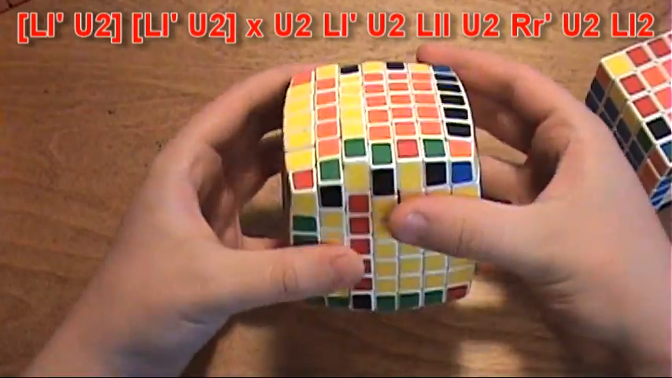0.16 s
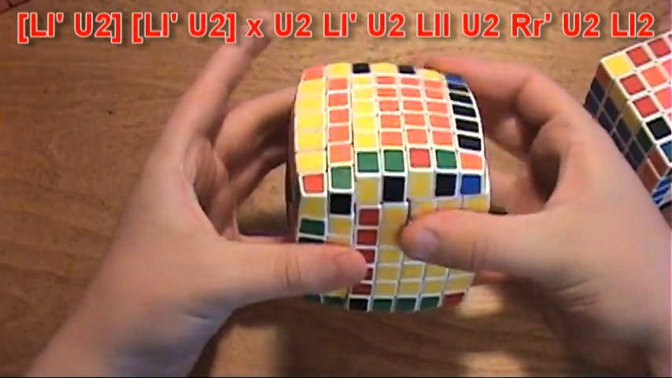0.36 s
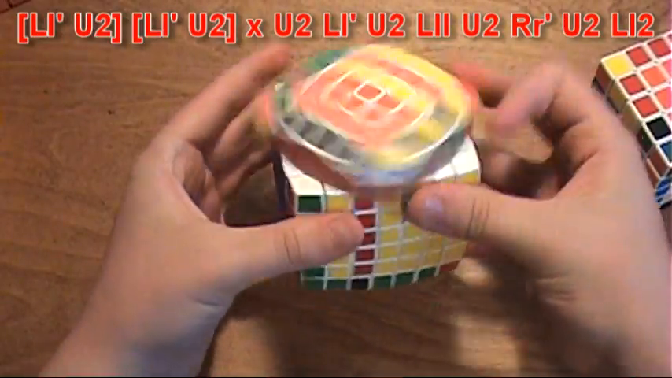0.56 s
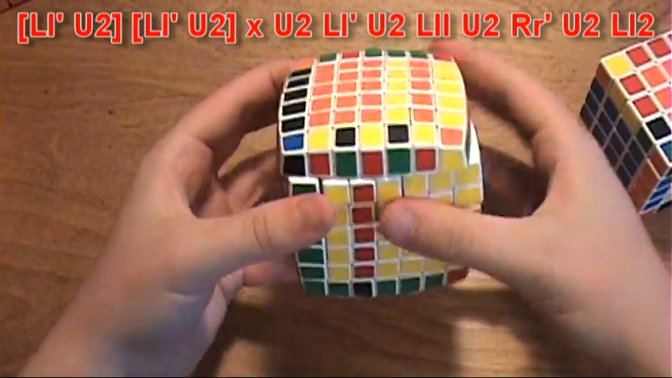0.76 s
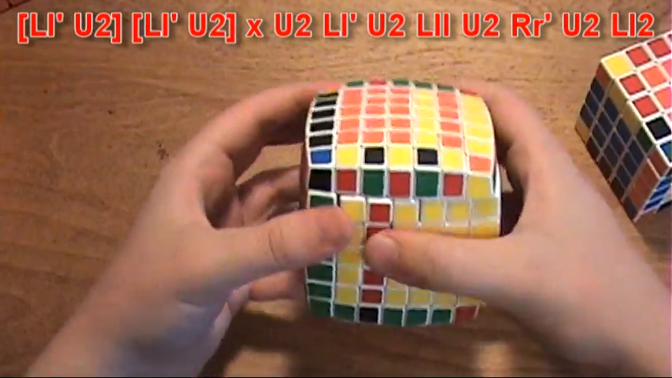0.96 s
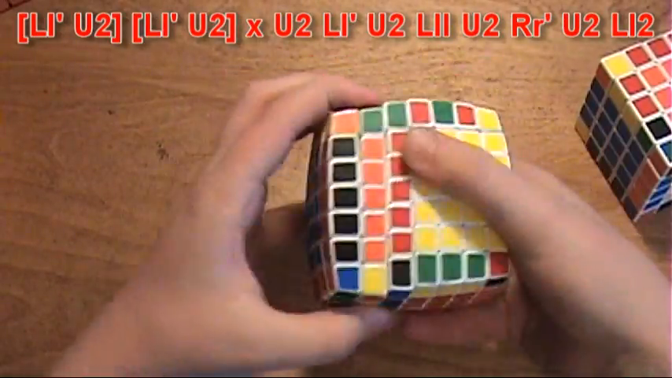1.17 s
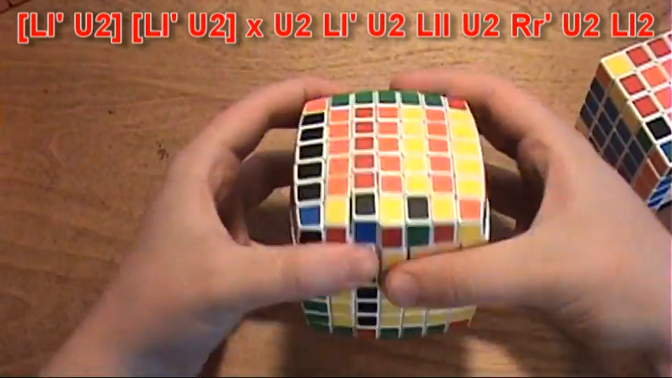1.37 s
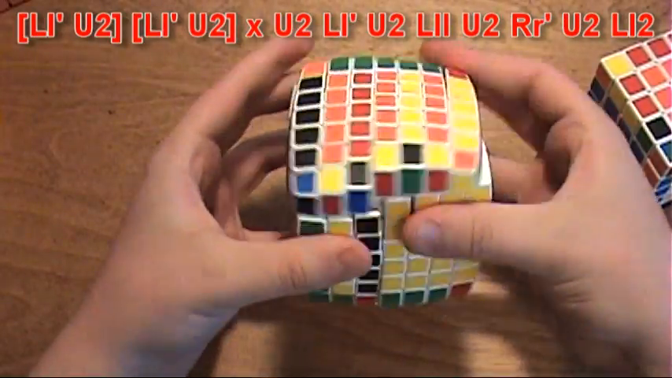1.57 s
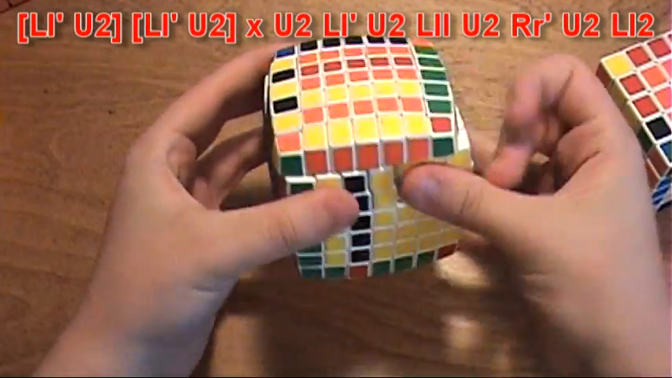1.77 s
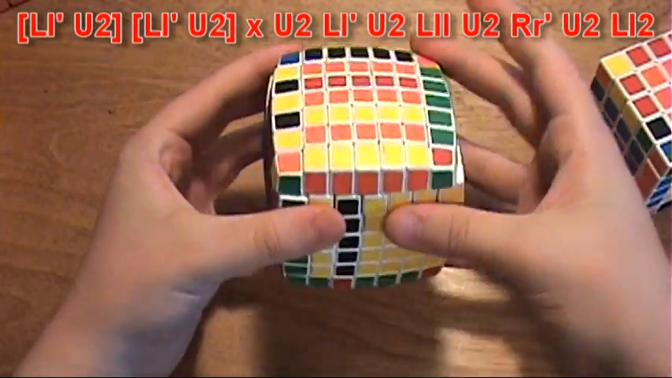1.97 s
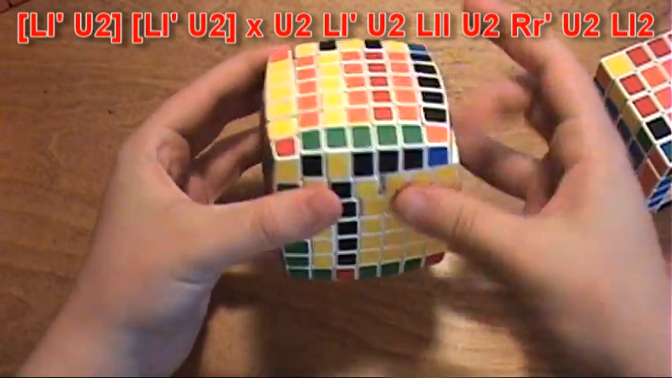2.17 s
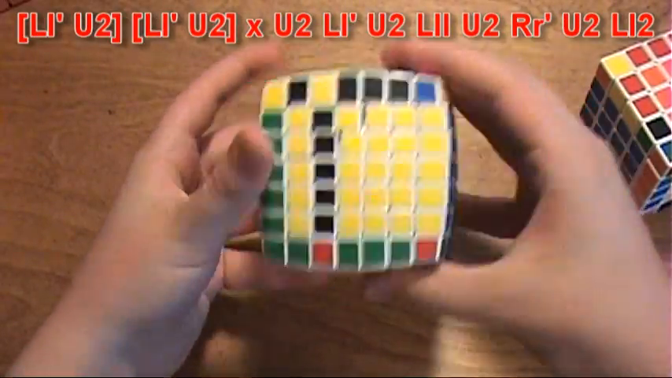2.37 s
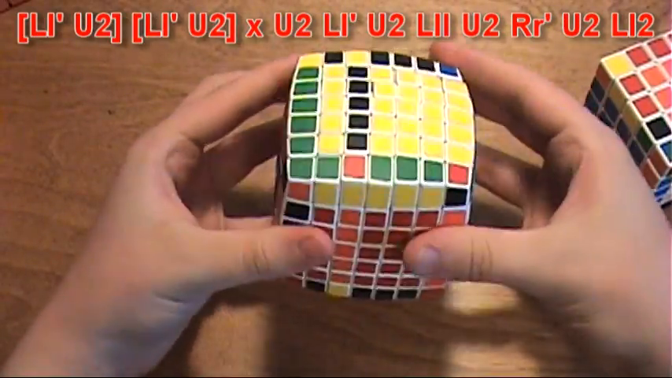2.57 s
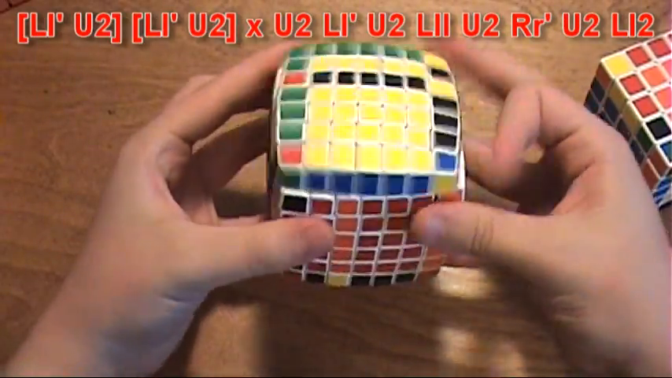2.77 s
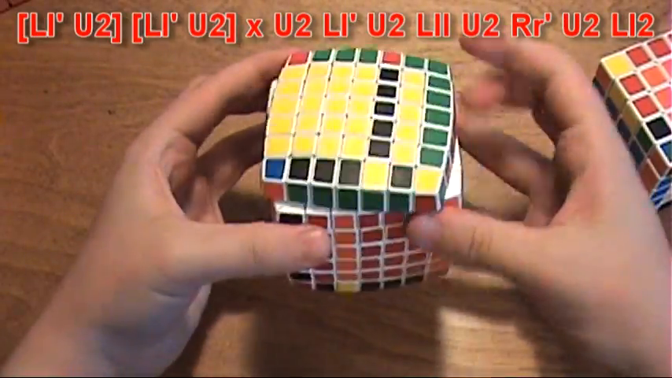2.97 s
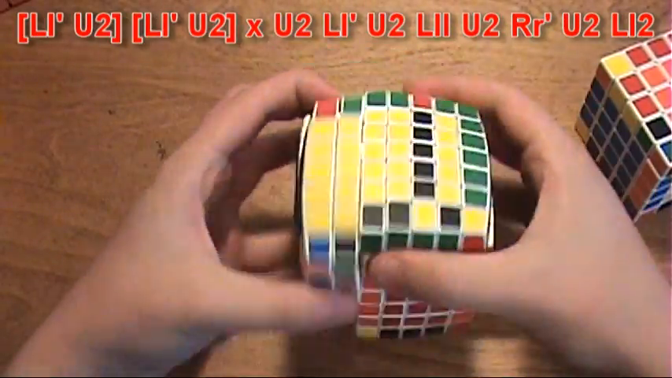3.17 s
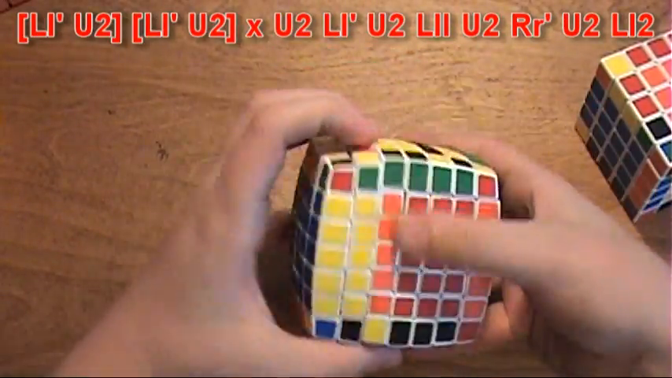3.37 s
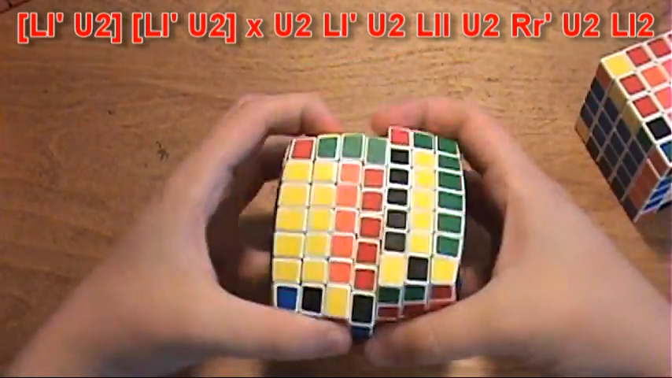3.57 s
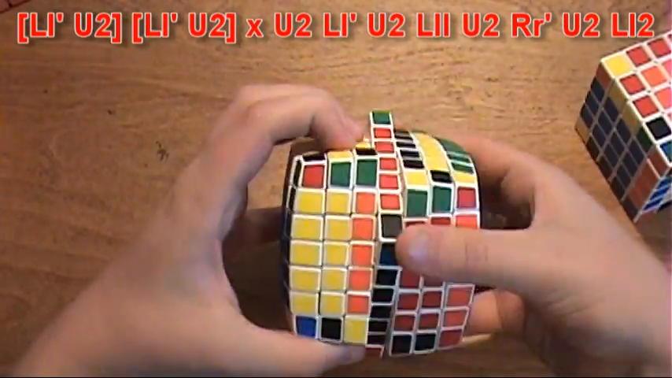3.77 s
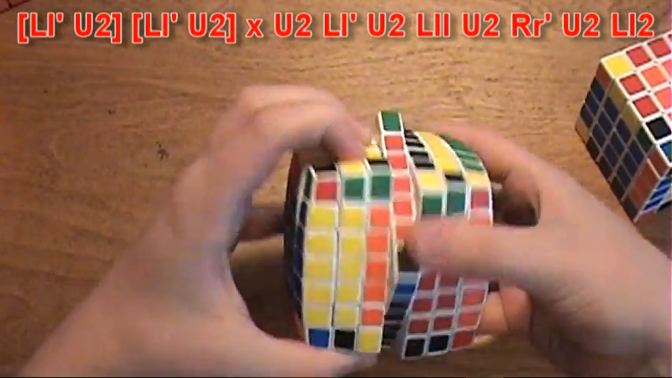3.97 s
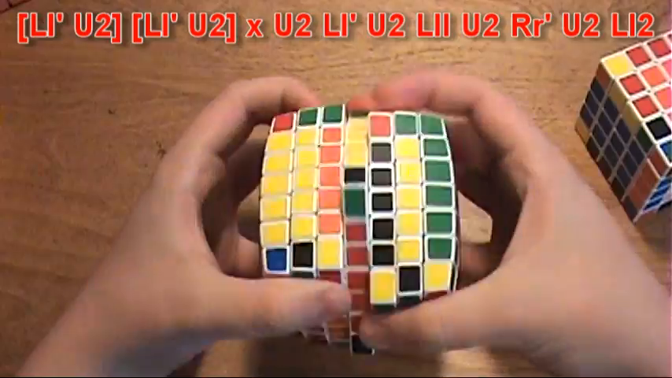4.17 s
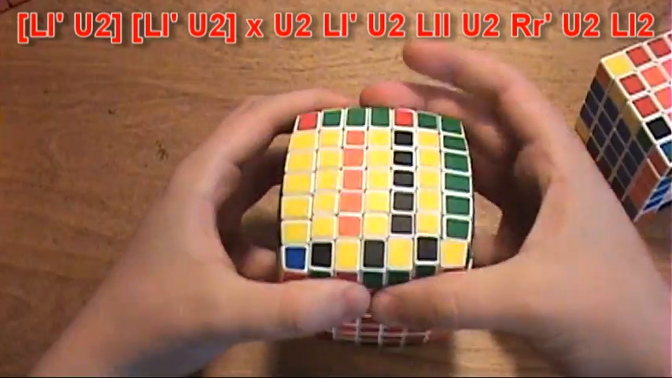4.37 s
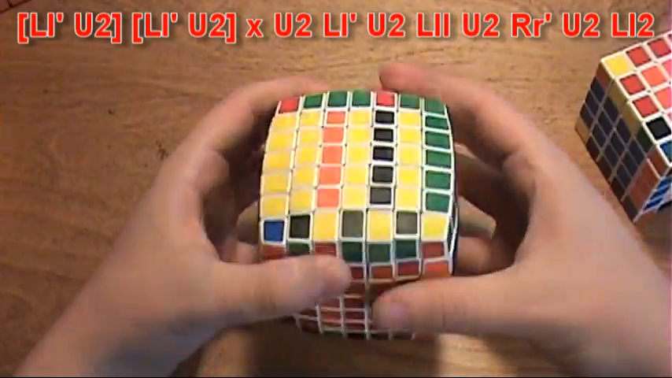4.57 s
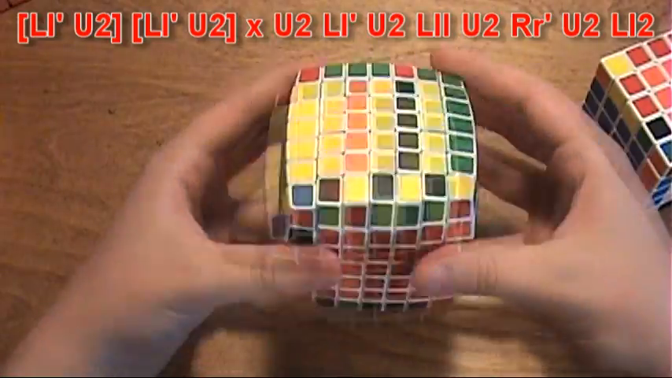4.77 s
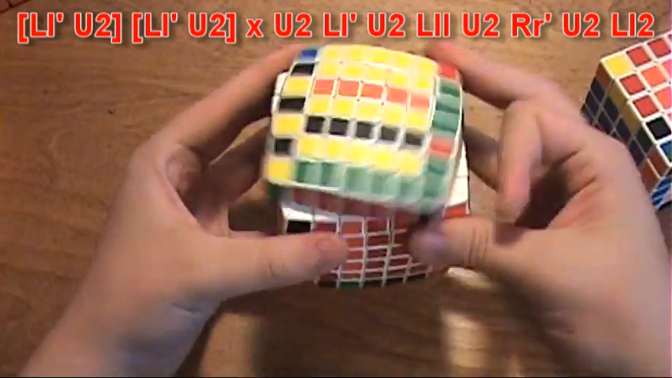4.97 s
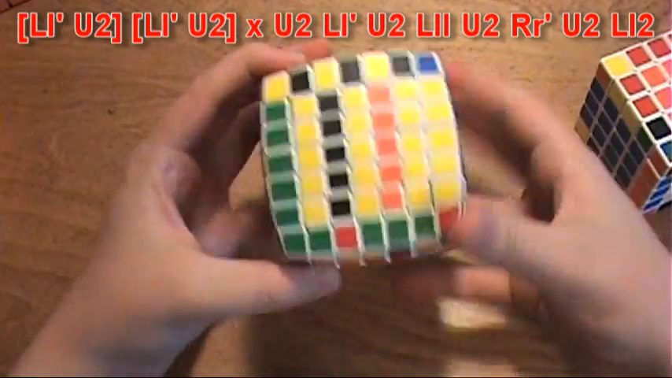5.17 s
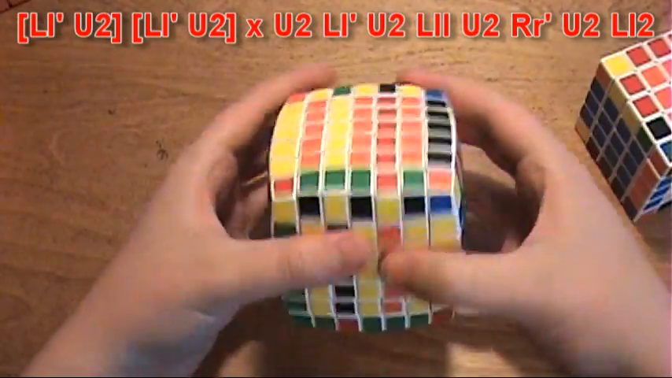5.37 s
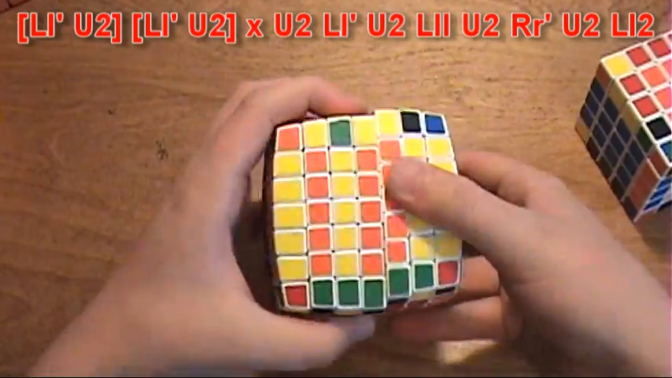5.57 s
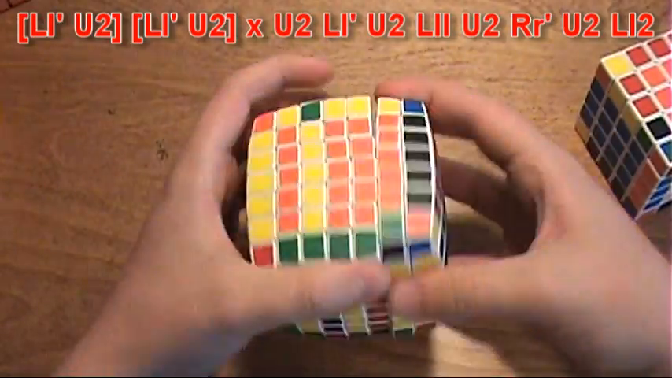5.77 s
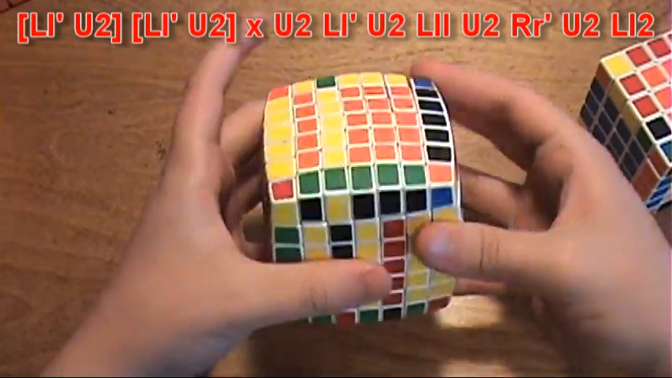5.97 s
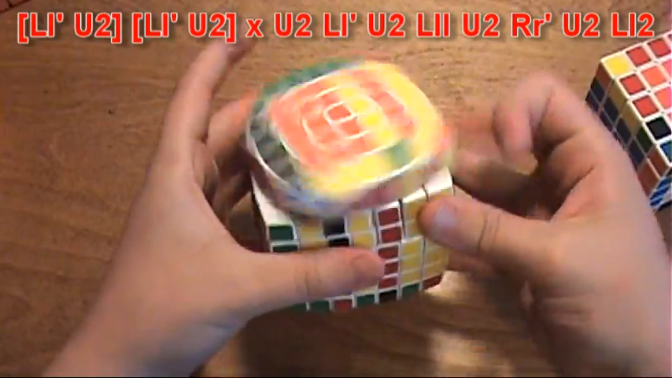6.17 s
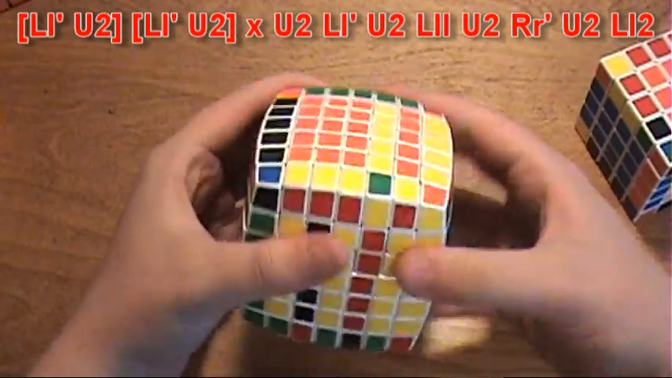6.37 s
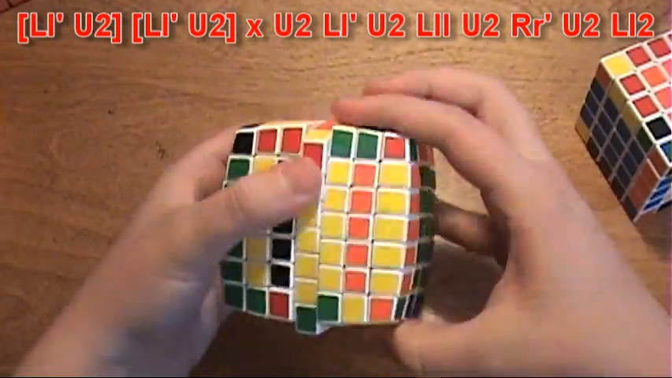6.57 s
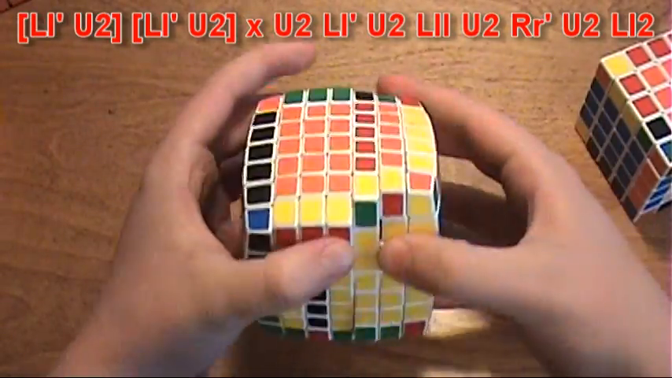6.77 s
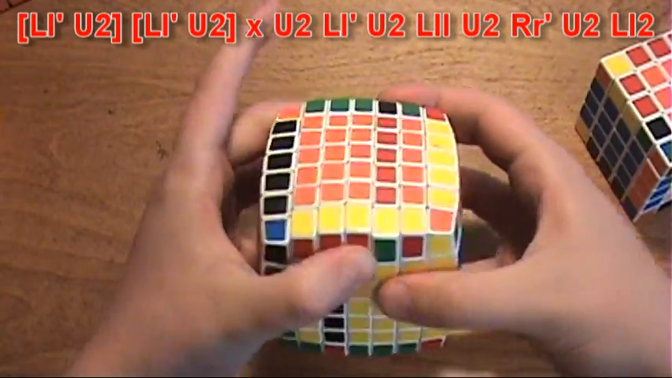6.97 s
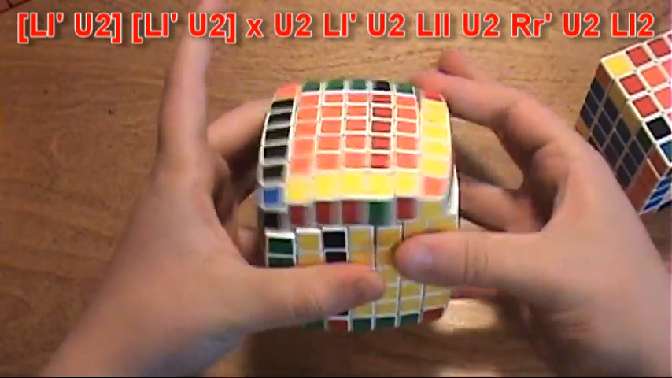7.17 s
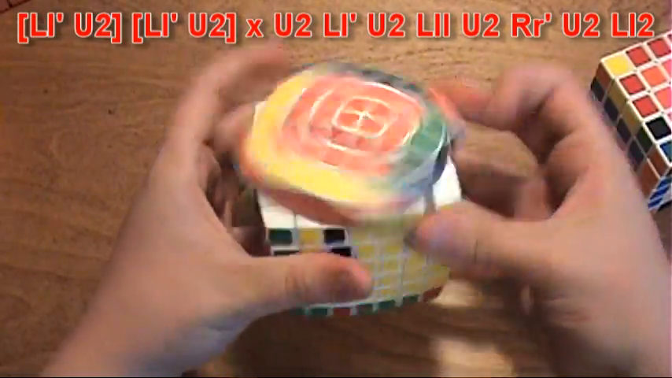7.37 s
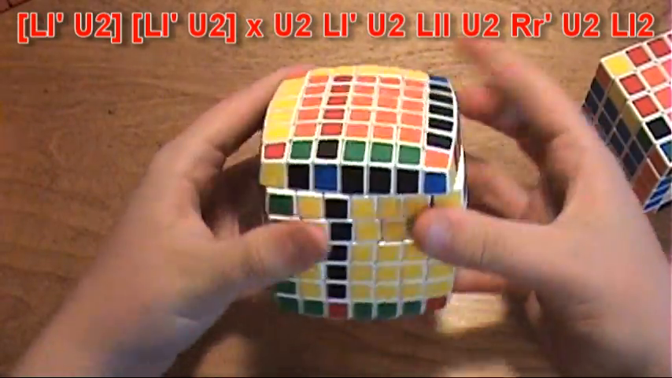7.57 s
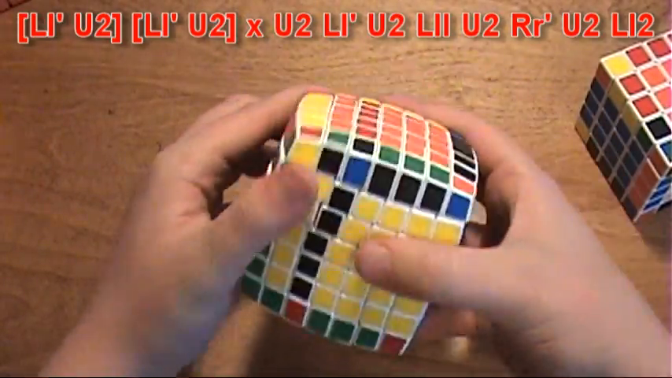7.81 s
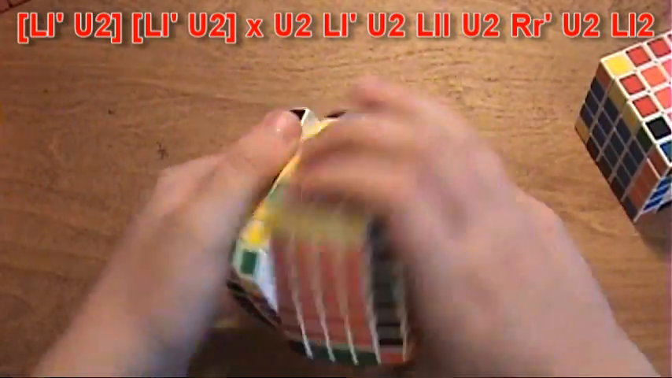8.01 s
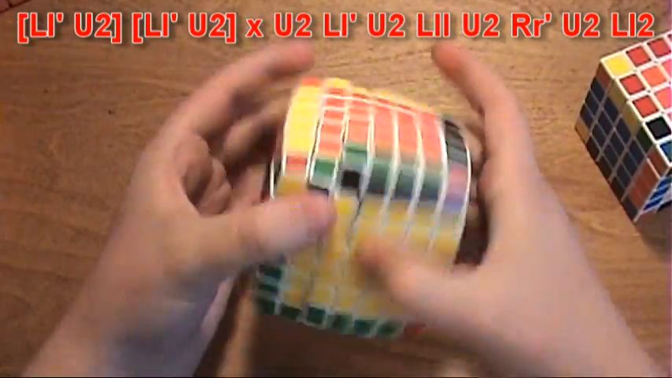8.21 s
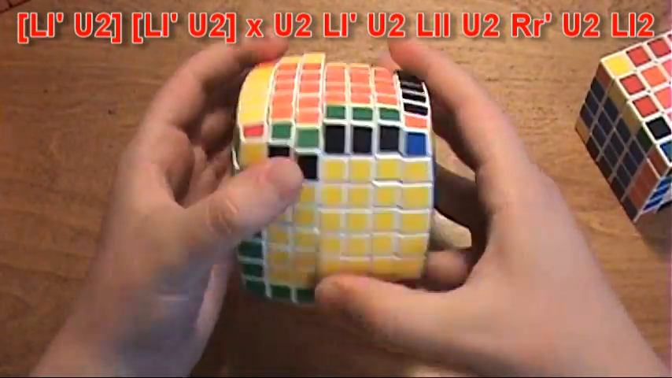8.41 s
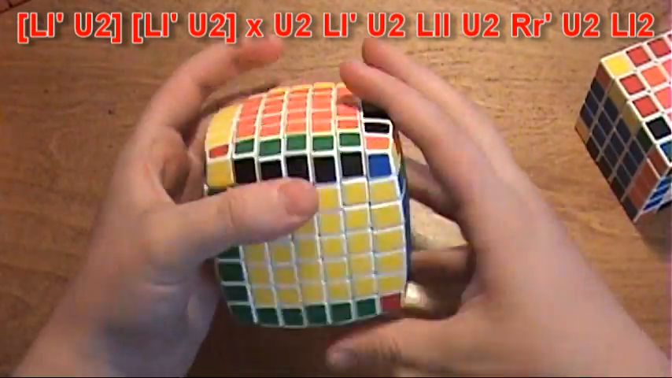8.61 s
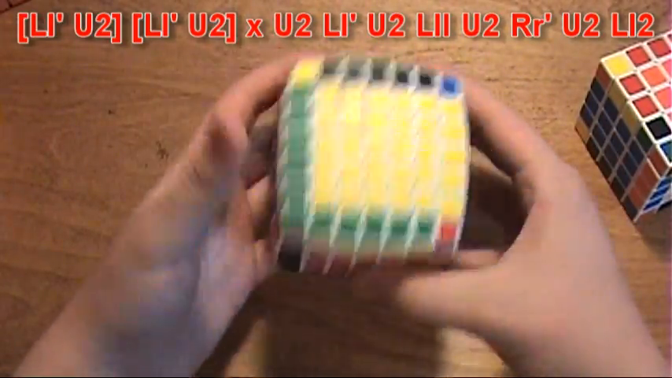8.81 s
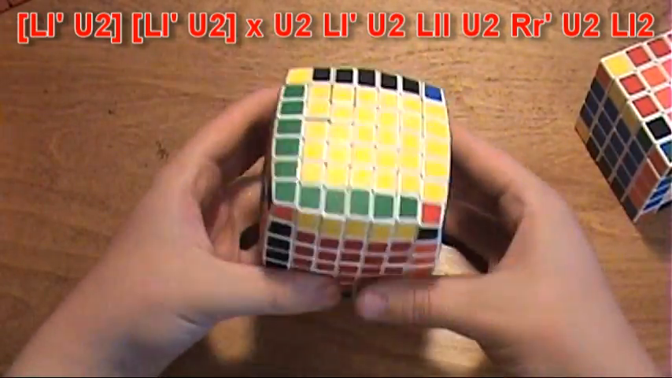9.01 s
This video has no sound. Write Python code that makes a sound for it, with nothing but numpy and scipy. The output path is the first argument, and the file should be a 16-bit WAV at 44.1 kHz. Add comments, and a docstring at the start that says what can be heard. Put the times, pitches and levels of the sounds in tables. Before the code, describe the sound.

A large plastic puzzle cube is twisted by hand close to a stereo microphone. Each turn is a short, rattling scrape with a cluster of sharp clicks and a slightly hollow ring. After a single snap at the start, loud clusters come at about 0.5, 1.7, 2.1 and 2.8 seconds, with lighter turns between. Scrapes and clicks continue from 3.2 to 3.5 seconds, then thin out, with one sharp snap near 4.3. A strong burst lands around 5 seconds, and more turns follow closely, loudest near 6.2, 6.7, 7.4 and 8.2 seconds. Only light, scattered ticks remain from 8.5 seconds to the end at about 9. The hardest snaps come with small, low pops as the microphone overloads. The room is quiet, with little echo, a faint steady hiss and electrical hum, and barely audible low nudges against the wooden table.

```python
"""Puzzle cube over a wooden table.

Two hands twist a large plastic cube close to a small stereo microphone pair. Turning layers rattle and
scrape, tiles snap into line, and both ring the hollow shell. Loud snaps come with low overload pops;
the table hums faintly under the wrists. Behind: a quiet room, hiss and mains hum."""
import sys
import numpy as np
from scipy import signal
from scipy.fft import rfft, irfft
from scipy.io import wavfile
from scipy.ndimage import uniform_filter1d

SR = 44100
rng = np.random.default_rng(int(sys.argv[2]) if len(sys.argv) > 2 else 0)


def dump_mix(stems):
    """Bounce the given channels to the path in sys.argv[1] as a 16-bit WAV at rate SR."""
    frames = np.atleast_2d(stems).T  # one column per channel
    limited = np.clip(frames, -1, 1)  # hard clip at full scale
    pcm = np.round(limited * 32767).astype(np.int16)
    wavfile.write(sys.argv[1], SR, pcm)


N = 398884

# Tiles snapping past each other. Each row: start in seconds, level over 3 ms in dB, ring pitch in Hz.
SNAPS = [(0.0519, -22.5, 4950), (0.178, -38.5, 5350), (0.3194, -37, 3550), (0.4303, -35.5, 4170),
         (0.4797, -27, 4390), (0.4923, -21, 4080), (0.5, -22, 3480), (0.5158, -14.5, 4680),
         (0.5281, -14, 4540), (0.5478, -26, 4030), (0.6153, -28, 4020), (0.6425, -21, 8550),
         (0.958, -44.5, 5170), (0.984, -41, 4000), (1.0202, -35.5, 4400), (1.058, -34.5, 4030),
         (1.1084, -18.5, 6450), (1.1303, -33, 7300), (1.1514, -33, 4440), (1.2921, -26.5, 2650),
         (1.3094, -23.5, 5170), (1.3229, -31, 2310), (1.3499, -20, 4060), (1.611, -35.5, 1940),
         (1.628, -29.5, 5140), (1.6609, -28, 3570), (1.6749, -18.5, 8400), (1.6958, -15, 3960),
         (1.7104, -14.5, 4650), (1.7634, -17, 2740), (1.7776, -27, 3970), (2.0062, -19.5, 3600),
         (2.0637, -26, 3860), (2.0782, -21.5, 4000), (2.1082, -22.5, 2330), (2.1206, -16, 9700),
         (2.133, -21.5, 5200), (2.148, -16, 4670), (2.3201, -26.5, 3920), (2.377, -23.5, 2440),
         (2.5607, -34.5, 4630), (2.58, -35.5, 7100), (2.633, -39.5, 3000), (2.7849, -16.5, 5300),
         (2.804, -15, 4400), (2.829, -21, 4230), (2.8751, -30, 3620), (2.8951, -18.5, 3170),
         (2.9028, -13, 9200), (2.9201, -17, 3960), (3.025, -40, 6000), (3.0445, -38.5, 4100),
         (3.1457, -33, 6950), (3.1889, -38, 3880), (3.2187, -23.5, 6660), (3.2395, -24, 4240),
         (3.27, -20, 8950), (3.289, -38, 3230), (3.412, -31, 1670), (3.4739, -20, 4600),
         (3.4369, -33, 8000), (3.5338, -16, 8800), (3.6734, -30.5, 2240), (4.021, -43, 1940),
         (4.085, -26.5, 2430), (4.2693, -17.5, 4140), (4.5444, -28, 8100), (4.5541, -31, 5130),
         (4.6752, -36.5, 4040), (4.797, -39, 1730), (4.9265, -24.5, 4180), (4.9345, -16, 4120),
         (4.9481, -16, 3800), (4.9626, -27, 3760), (4.9754, -21.5, 4520), (4.9879, -17.5, 3530),
         (5.036, -22, 7100), (5.0611, -17, 3950), (5.0747, -24, 4540), (5.0872, -21, 4480),
         (5.2531, -26, 4660), (5.2867, -31, 3900), (5.4053, -22.5, 8600), (5.5029, -28.5, 2800),
         (5.5396, -22, 3100), (5.5709, -25.5, 2140), (5.6644, -35, 8750), (5.6985, -38, 4480),
         (5.7304, -27.5, 765), (5.7696, -22.5, 4330), (6.0359, -32.5, 2450), (6.0929, -18.5, 4200),
         (6.1349, -23, 9100), (6.1576, -22.5, 3630), (6.1948, -21, 3470), (6.2074, -18.5, 3300),
         (6.2441, -20.5, 3750), (6.4208, -34, 1980), (6.4687, -39, 3630), (6.5251, -27, 1910),
         (6.5465, -22, 7000), (6.5618, -26, 4950), (6.6607, -29, 3400), (6.6959, -18.5, 3900),
         (6.7445, -18, 3430), (6.8062, -34, 1990), (6.974, -33, 4420), (7.2436, -24, 3500),
         (7.3402, -21.5, 3850), (7.3514, -18.5, 3730), (7.3857, -26, 5030), (7.422, -14.5, 3880),
         (7.4465, -17, 4390), (7.4539, -15.5, 4370), (7.662, -37.5, 4200), (7.862, -38.5, 7500),
         (7.877, -32, 4050), (7.8895, -30.5, 3750), (7.9188, -33, 7900), (7.9613, -23.5, 6200),
         (8.0092, -21, 4560), (8.0353, -18.5, 4930), (8.131, -32, 3830), (8.1445, -25, 4340),
         (8.1609, -23.5, 1700), (8.1773, -22, 3640), (8.2016, -15, 2650), (8.2154, -15.5, 6400),
         (8.2291, -24, 2800), (8.2463, -21, 2840), (8.2643, -25, 4650), (8.4774, -30, 4430),
         (8.527, -28.5, 10000), (8.7444, -33.5, 1690), (8.7742, -36.5, 9730), (8.796, -33.5, 5970),
         (8.8587, -32.5, 3420), (8.8727, -29, 8700), (8.962, -41.5, 2880)]
# Layers sliding. Each row: start in seconds, length in seconds, rubbing level in dB.
SLIDES = [(0.185, 0.035, -49.5), (0.461, 0.087, -27.5), (0.599, 0.056, -22.5), (1.076, 0.079, -27),
          (1.264, 0.12, -33), (1.643, 0.077, -23.5), (1.764, 0.039, -26.5), (2.072, 0.089, -27.5),
          (2.205, 0.034, -48), (2.373, 0.058, -44.5), (2.56, 0.039, -43), (2.741, 0.1, -26.5),
          (2.881, 0.049, -22), (2.978, 0.086, -51.5), (3.189, 0.12, -30.5), (3.394, 0.021, -31),
          (3.463, 0.094, -31), (3.664, 0.13, -44.5), (3.904, 0.035, -54), (4.018, 0.13, -33.5),
          (4.247, 0.033, -25), (4.877, 0.04, -40), (4.93, 0.057, -19.5), (5.03, .065, -25),
          (5.248, 0.071, -43), (5.511, 0.095, -28.5), (5.715, 0.092, -30), (6.05, 0.088, -25.5),
          (6.189, 0.045, -21.5), (6.384, 0.11, -49), (6.468, 0.021, -40.5), (6.509, 0.082, -28),
          (6.669, 0.1, -29), (7.222, 0.042, -32), (7.27, 0.05, -26.5), (7.407, 0.059, -20),
          (7.656, 0.066, -50), (7.912, 0.17, -27.5), (8.159, 0.12, -21.5), (8.47, 0.11, -49.5)]
# Lone tiles flicked. Each row: start in seconds, level in dB, pitch in Hz.
PINGS = [(0.7736, -38.5, 870), (1.528, -29.5, 4400), (3.3941, -19.5, 4400), (4.715, -40.5, 3920),
         (4.827, -40, 4170), (6.002, -39.5, 815), (6.302, -22.5, 4470), (8.697, -37, 544),
         (8.875, -34.5, 5500), (8.9189, -41.5, 830)]
# Rings of tiles of different size. Each entry: pitch in Hz.
TILE_HZ = [1960, 2530, 3220, 4910, 6930, 9700]
# Spectrum of a plastic tick. Each row: frequency in Hz, relative level in dB.
PLASTIC_SPECTRUM = [(150, -34.5), (420, -18.5), (1000, -17.5), (1800, -6.5), (3000, -6), (3900, -1),
                    (5550, -6), (8640, -5.5), (14200, -14.5), (15900, -35)]
# Modes of the hollow shell. Each row: frequency in Hz, width in Hz, base gain in dB.
SHELL_MODES = [(236, 80, 25.5), (422, 112, 22.5), (636, 98, 27), (734, 98, 34.5), (797, 128, 27)]
# Slow drift of the shell ring. Each row: time in seconds, offset in dB.
SHELL_DRIFT = [(0, -3), (1.2, 3), (1.75, -2.5), (2.8, 0.5), (3.5, 2.5), (4.2, 3.5), (4.9, -0.5), (5.7, 4.5),
               (6.1, 1), (6.7, 1.5), (7.3, 2), (9, 1)]
# Changing grip on the modes under 500 Hz. Each row: time in seconds, offset in dB.
LOW_MODE_GRIP = [(0, 2), (2, 1.5), (3.5, 2), (4.1, 4), (5.1, -0.5), (5.6, 9.5), (6.3, -0.5), (8.6, -0.5)]
# Stereo balance of the cube. Each row: frequency in Hz, left minus right in dB.
BALANCE = [(200, 2), (1300, 2.3), (4400, 0), (8100, -.6), (15000, 0)]
# Phase between the microphone ports. Each row: frequency in Hz, left lead in radians.
PORT_LEAD = [(2500, -0.064), (5300, -0.59), (7500, 0.32), (15000, 0.11)]
# Low overload pops. Each row: start in seconds, level in dB, 1 if polarity is inverted.
OVERLOAD_POPS = [(0.0521, -20, 0), (0.5348, -15, 0), (1.661, -27, 0), (1.6957, -17, 0), (2.1212, -16, 1),
                 (2.9023, -18, 0), (2.921, -24, 0), (3.534, -24, 0), (4.2723, -26.5, 0), (4.963, -19, 1),
                 (6.745, -18.5, 0), (7.4253, -15, 0), (8.2151, -17.5, 1)]
# Wrists nudging the table. Each row: start in seconds, peak in dB.
NUDGES = [(1.801, -50), (4.999, -50), (5.751, -49), (6.448, -53), (7.359, -46), (7.844, -52),
          (8.963, -45.5)]
# Room decay. Each row: frequency in Hz, T60 in seconds.
ROOM_T60 = [(700, 0.33), (2790, 0.27), (7350, 0.23), (14000, 0.023)]
# Hiss of room and electronics. Each row: frequency in Hz, relative level in dB.
HISS_SPECTRUM = [(30, -12), (120, -10), (580, -10.5), (750, -7), (1260, -12.5), (1940, -12), (5000, -18),
                 (7700, -19.5), (11000, -28.5), (16000, -43)]
# Hiss shared by the sides. Each row: frequency in Hz, left-right correlation.
HISS_CORRELATION = [(130, -0.3), (400, -0.56), (7000, 0.51)]
# Mains harmonics. Each row: frequency in Hz, base level in dB.
MAINS_HARMONICS = [(60, -69), (180, -67), (300, -71.5)]


def cube():
    """Snaps, rubbing and loose tiles ring the shell's modes; pings sound on top."""
    start_s, length_s, slide_db = np.transpose(SLIDES)
    shell_db = -18 - 0.0636 * slide_db  # gentle slides sound hollower
    shell_db += np.interp(start_s, *np.transpose(SHELL_DRIFT))
    low_mode_db = np.interp(start_s, *np.transpose(LOW_MODE_GRIP))
    finger_db = 2 * rng.standard_normal((len(SLIDES), len(SHELL_MODES))).T  # damping varies by slide
    contacts = snaps() + colour(slide_envelope() * rubbing() + loose_tiles(), PLASTIC_SPECTRUM)
    out = contacts + pings()
    for (hz, width_hz, mode_db), held_db in zip(SHELL_MODES, finger_db):
        drive_db = mode_db + shell_db + held_db + (hz < 500) * low_mode_db
        drive = gain_of(np.interp(np.arange(N) / SR, start_s + length_s / 2, drive_db))
        out += resonate(contacts * drive, hz, width_hz)
    return out


def snaps():
    """A row of tiles lands within a few ms: a knot of ticks, tight or loose, with its own ring."""
    t, out = np.arange(500) / SR, np.zeros(N)
    t60_s = rng.uniform(.011, .028, (len(SNAPS), 1))
    envelopes = (1 - np.exp(-t / .0013)) * gain_of(-60 * t / t60_s)
    knots = ticks((len(SNAPS), 500), per_s=7000, spread_db=3.9) * envelopes
    for (start_s, db, hz), knot in zip(SNAPS, knots):
        snap = colour(knot + 2.1 * resonate(knot, hz, hz / 4.5), PLASTIC_SPECTRUM)
        add(out, start_s, gain_of(db) * unit_energy(snap) * np.sqrt(.003 * SR))
    return out


def rubbing():
    """Layers catch and slip: clumps of ticks, each ringing one tile, over a finer scrape."""
    slip = np.exp(-np.arange(500) / (0.0024 * SR))
    rattle = np.zeros(N)
    for hz in TILE_HZ:
        slips = signal.oaconvolve(abs(ticks(N, per_s=100, spread_db=2.0)), slip)[:N]
        clumps = slips * ticks(N, per_s=4500, spread_db=2.9)
        rattle += clumps + 2.4 * resonate(clumps, hz, hz / 4)
    scrape = 0.38 * rng.standard_normal(N)
    return unit_rms(unit_rms(rattle) + scrape)


def slide_envelope():
    """Each slide creeps in, swells to its fastest moment, eases and trails off."""
    lead_s, trail_s, fastest_share = 0.021, 0.038, 0.7
    power = np.zeros(N)
    for start_s, length_s, db in SLIDES:
        t = np.arange(-lead_s, length_s + trail_s, 1 / SR)
        corners_s = [-lead_s, 0, fastest_share * length_s, length_s, length_s + trail_s]
        shape_db = np.interp(t, corners_s, [-33.5, -6, 0, -7.5, -25])
        add(power, start_s - lead_s, gain_of(db + shape_db) ** 2)
    return np.sqrt(power)


def pings():
    """A flicked tile: a short tick and a clean ring that swells and dies within a few ms."""
    t, out = np.arange(500) / SR, np.zeros(N)
    for (start_s, db, hz), noise in zip(PINGS, rng.standard_normal((len(PINGS), 500))):
        ring = t * np.exp(-t / .00055) * np.sin(2 * np.pi * hz * t)
        tick = colour(noise * np.exp(-t / 0.0027), PLASTIC_SPECTRUM)
        ping = unit_energy(ring) + .5 * unit_energy(tick)
        add(out, start_s, gain_of(db) * ping * np.sqrt(.003 * SR))
    return out


def loose_tiles():
    """Loose tiles shift under the fingers: faint, dull, scattered ticks."""
    shift = np.exp(-np.arange(900) / (0.0017 * SR))
    shifts = signal.oaconvolve(abs(ticks(N, per_s=60, spread_db=3.0)), shift)[:N]
    clumps = shifts * ticks(N, per_s=6000, spread_db=1.5)
    return gain_of(-67) * unit_rms(resonate(clumps, hz=1400, width_hz=3800))


def overload_pops():
    """Low overload pops on loud snaps: 2 ms pulses, opposite in polarity and weaker on the left."""
    t, out = np.arange(2000) / SR, np.zeros((2, N))
    pulse = (t / 0.001) ** 2 * np.exp(2 - 2 * t / 0.00089)
    pulse = signal.lfilter(*signal.butter(1, 14, "high", fs=SR), pulse)  # slow undershoot
    sides = np.array([[-.48], [1]])
    for start_s, db, inverted in OVERLOAD_POPS:
        add(out, start_s, (-1) ** round(inverted) * gain_of(db) * sides * pulse)
    return out


def table_top():
    """The top's low mode swells and dies after each nudge; slighter wrist shifts keep stirring it."""
    mode_hz, t60_s, rise_s = 132, .16, 0.019
    t, out = np.arange(SR // 3) / SR, np.zeros(N)
    ring = gain_of(-60 * t / t60_s) * (1 - np.exp(-t / rise_s)) * np.sin(2 * np.pi * mode_hz * t)
    ring /= ring.max()
    for start_s, db in NUDGES:
        add(out, start_s, gain_of(db) * ring)
    stirring = signal.oaconvolve(ticks(N, per_s=12, spread_db=1.5), ring)[:N]
    return out + gain_of(-64) * stirring


def room(x):
    """Sparse wall reflections, each band dying at its own rate."""
    taps = np.zeros((2, SR // 2))
    slots = np.arange(120, SR // 2 - 20, 20)
    arrivals = slots + rng.integers(0, 20, (2, len(slots)))
    np.put_along_axis(taps, arrivals, rng.choice([-1., 1.], arrivals.shape), 1)
    taps[1] = 0.52 * taps[0] + 0.93 * taps[1]  # close ports share reflections
    hz, t, spectra = signal.stft(taps, SR, nperseg=128)
    decay = gain_of(-60 * t / curve_at(ROOM_T60, hz)[:, None])
    tail = signal.istft(spectra * decay, SR, nperseg=128)[1]
    tail /= np.linalg.norm(tail, axis=1, keepdims=True)
    return signal.fftconvolve(x, tail, axes=1)[:, :N]


def hiss():
    """Patchy noise of room and electronics, partly shared by the two sides."""
    frames, hz = N // 256 + 5, np.fft.rfftfreq(1024, 1 / SR)
    left_re, left_im, own_re, own_im, patches = rng.standard_normal((frames, 513, 5)).T
    patch_db = 1.4 * unit_rms(uniform_filter1d(uniform_filter1d(patches, 12, axis=0), 14, axis=1))
    correlation = curve_at(HISS_CORRELATION, hz)[:, None]
    left = left_re + 1j * left_im
    right = correlation * left + np.sqrt(1 - correlation ** 2) * (own_re + 1j * own_im)
    spectra = np.array([left, right]) * gain_of(curve_at(HISS_SPECTRUM, hz)[:, None] + patch_db)
    noise = signal.istft(spectra, nperseg=1024, noverlap=768)[1][:, :N]
    return gain_of(-51) * unit_rms(noise)


def mains_hum():
    """Wavering mains harmonics, stronger on the left."""
    t, hum = np.arange(N) / SR, np.zeros(N)
    for hz, db in MAINS_HARMONICS:
        waver_db = 2.7 * unit_rms(uniform_filter1d(rng.standard_normal(N), 12000))
        hum += gain_of(db + waver_db) * np.sin(2 * np.pi * hz * t + 6 * rng.random())
    return hum * np.array([[1.2], [.7]])


def ticks(shape, per_s, spread_db):
    """Sparse contacts of random sign, a few much larger than the rest."""
    hits = rng.random(shape) < per_s / SR
    sign = rng.choice([-1., 1.], shape)
    return sign * hits * gain_of(spread_db * np.minimum(rng.exponential(1, shape), 4))


def resonate(x, hz, width_hz):
    """Two-pole resonance, unit peak gain."""
    return signal.lfilter(*signal.iirpeak(hz, hz / width_hz, SR), x)


def colour(x, spectrum):
    """Minimum-phase filter of unit energy, shaped by a dB spectrum."""
    log_gain = curve_at(spectrum, abs(np.fft.fftfreq(4096, 1 / SR))) * np.log(10) / 20
    taps = np.fft.ifft(np.exp(np.conj(signal.hilbert(log_gain)))).real[:2048]
    return signal.oaconvolve(x, unit_energy(taps))[:len(x)]


def curve_at(points, hz):
    point_hz, value = np.transpose(points)
    return np.interp(np.log(hz + 1), np.log(point_hz + 1), value)


def gain_of(db):
    return 10 ** (np.asarray(db) / 20)


def unit_rms(x):
    return x / np.sqrt(np.mean(x ** 2) + 1e-20)


def unit_energy(x):
    return x / np.linalg.norm(x)


def add(mix, start_s, sound):
    part = mix[..., round(start_s * SR):][..., :sound.shape[-1]]
    part += sound[..., :part.shape[-1]]


def scene():
    """The cube leans left in the lows and mids and reaches the ports slightly apart; the room answers."""
    hz = np.fft.rfftfreq(N, 1 / SR)
    lean = gain_of(curve_at(BALANCE, hz) / 2) * np.exp(.5j * curve_at(PORT_LEAD, hz))
    spectrum = rfft(cube())
    direct = np.array([irfft(spectrum * lean, N), irfft(spectrum / lean, N)])
    return direct + gain_of(-15.5) * room(direct) + table_top() + overload_pops() + hiss() + mains_hum()


def record(dry):
    """The input stage rounds off the highest peaks; a low-pass limits the band."""
    ceiling, cutoff_hz = .85, 16300
    rounded = ceiling * np.tanh(dry / ceiling)
    low_pass = signal.firwin(511, cutoff_hz, window=("kaiser", 9), fs=SR)
    return signal.oaconvolve(rounded, low_pass[None], "same")


dry = scene()
out = record(dry)
dump_mix(out)
```